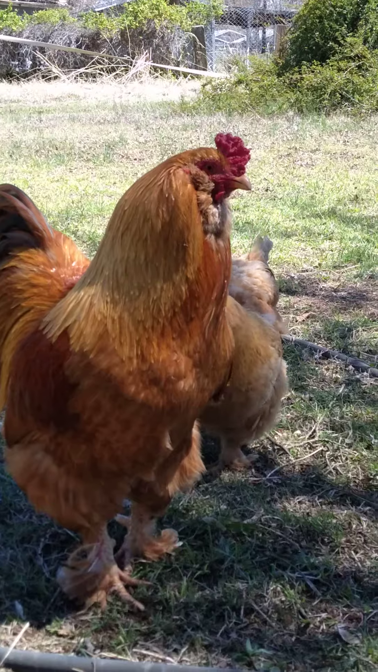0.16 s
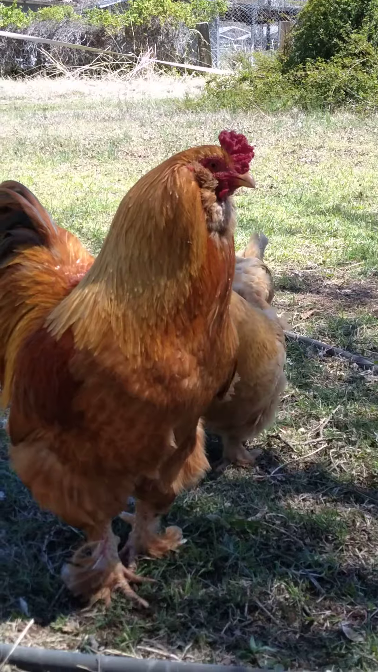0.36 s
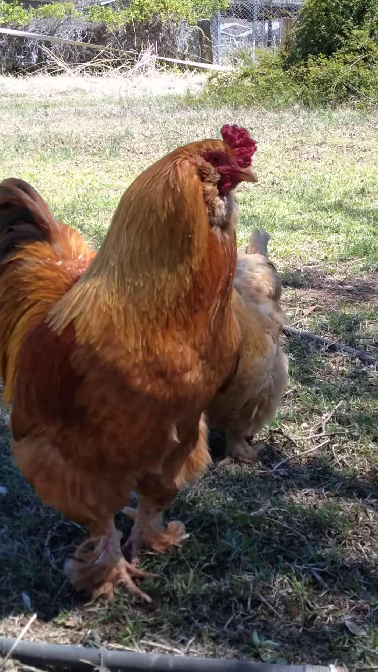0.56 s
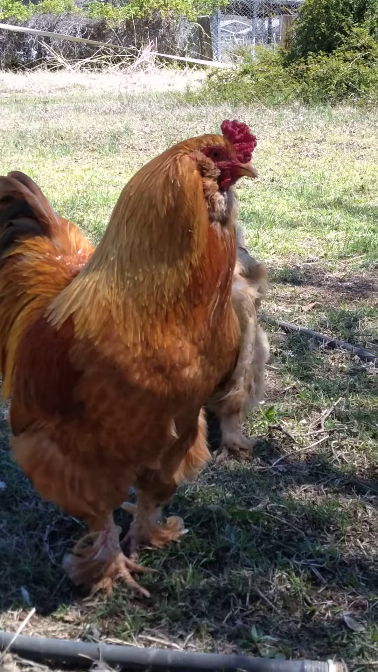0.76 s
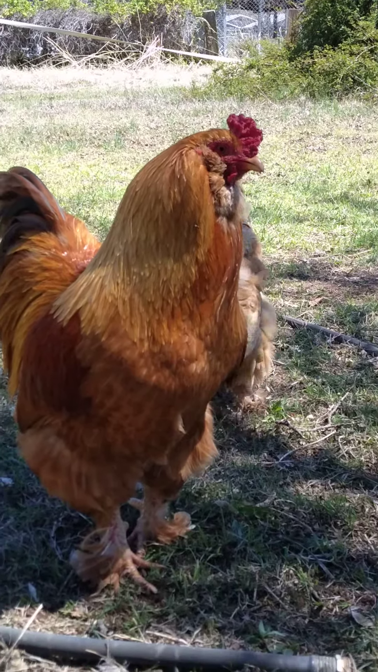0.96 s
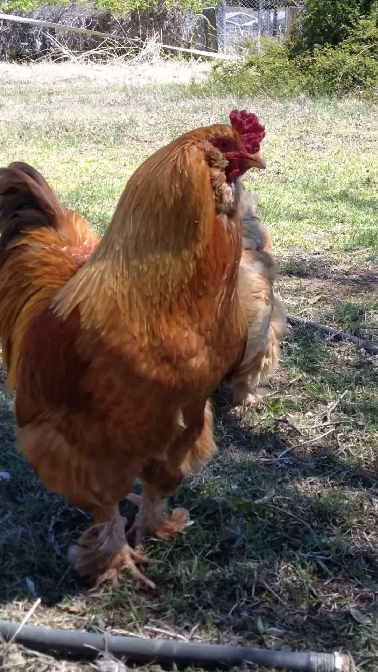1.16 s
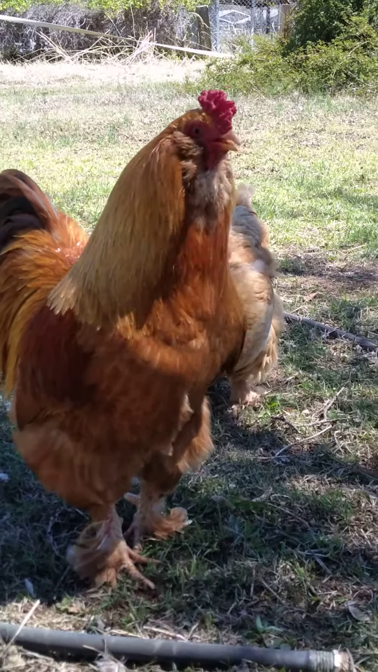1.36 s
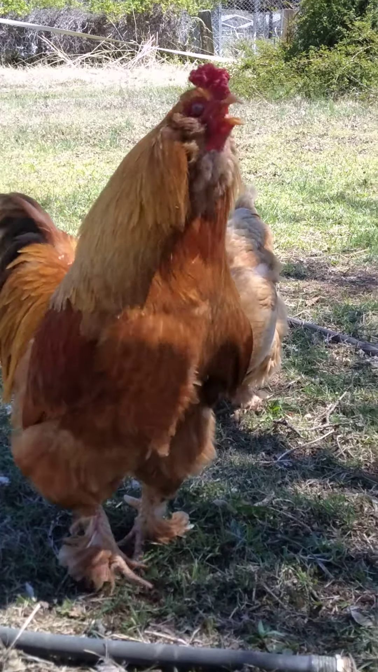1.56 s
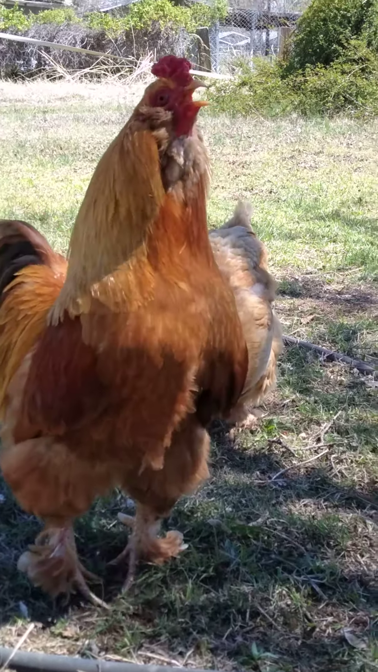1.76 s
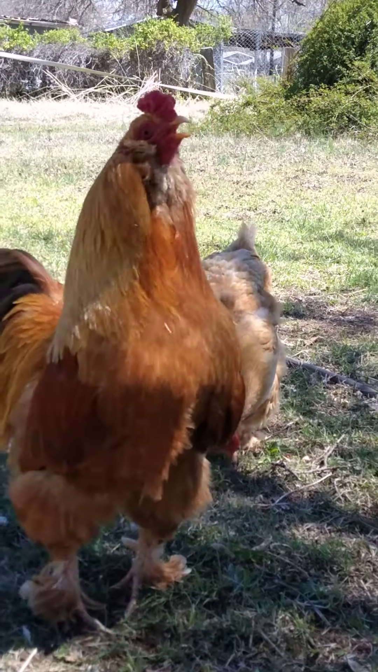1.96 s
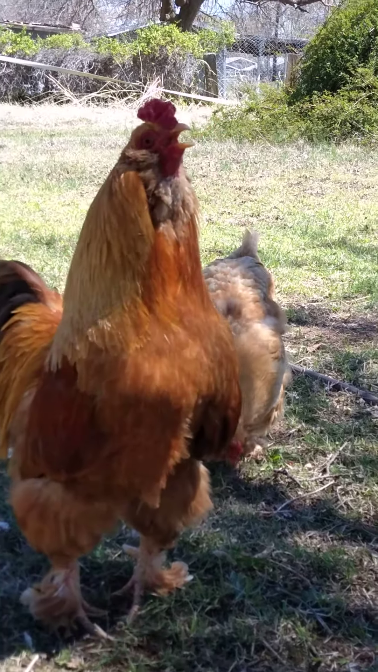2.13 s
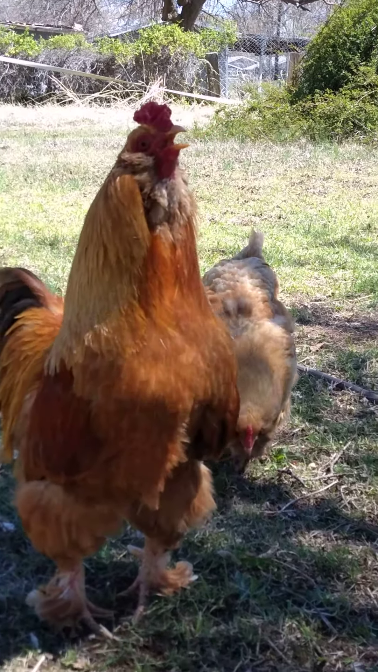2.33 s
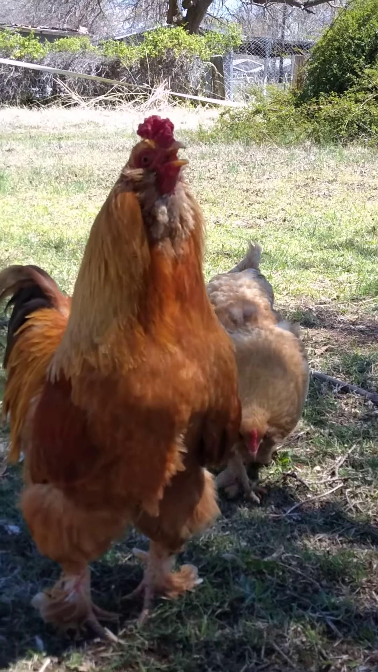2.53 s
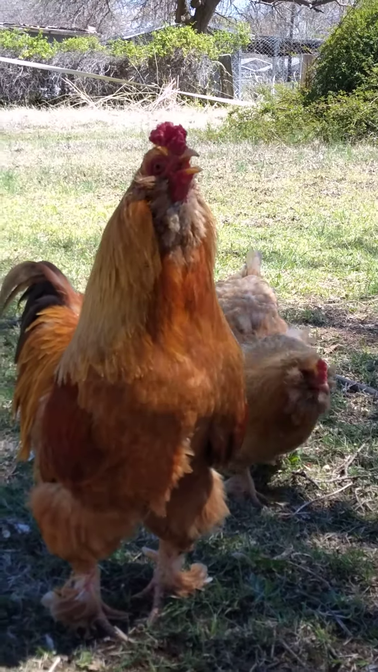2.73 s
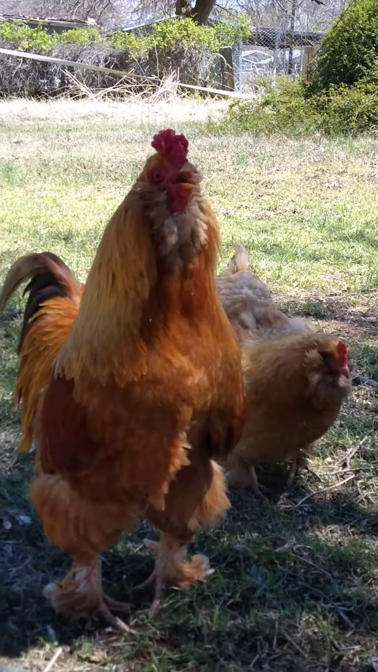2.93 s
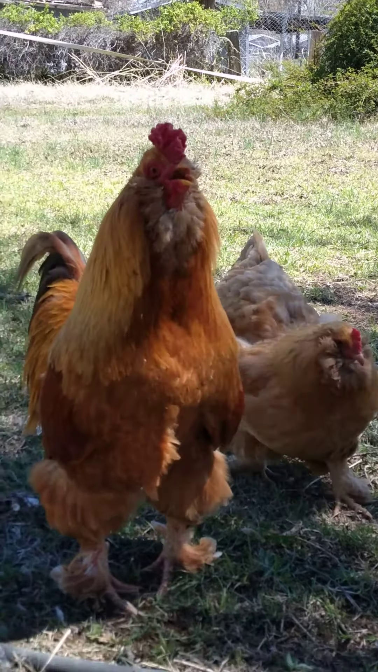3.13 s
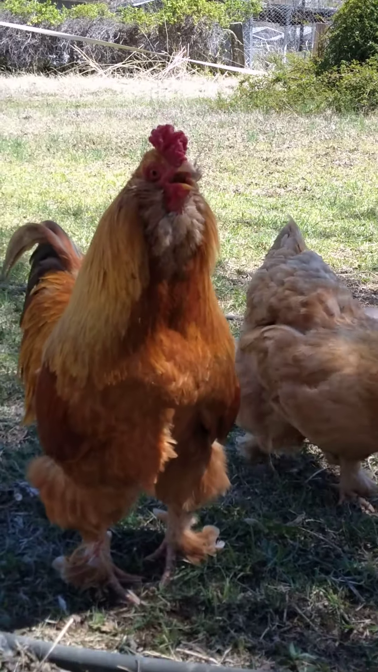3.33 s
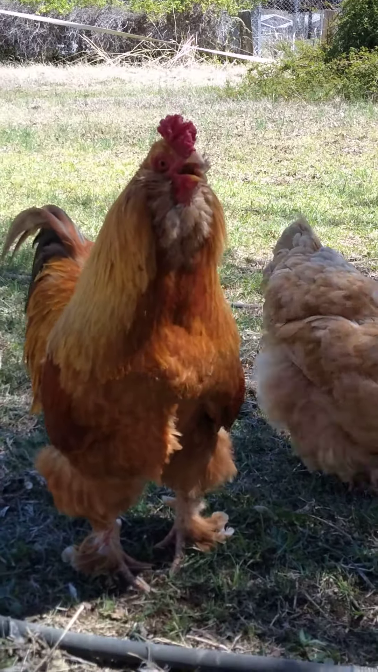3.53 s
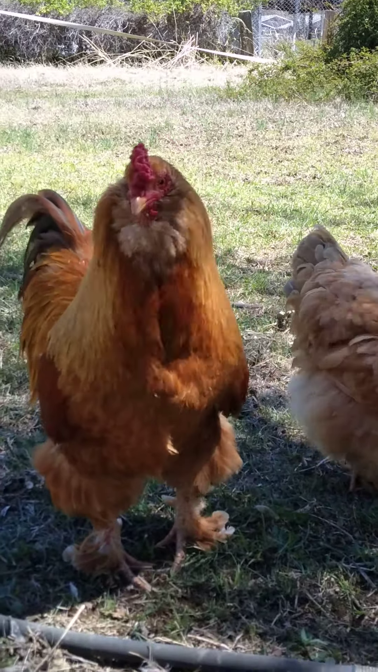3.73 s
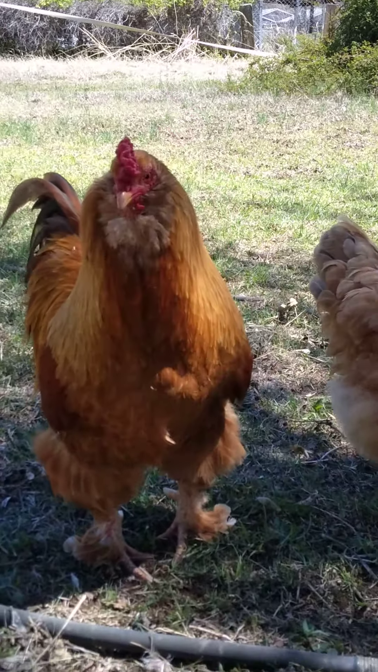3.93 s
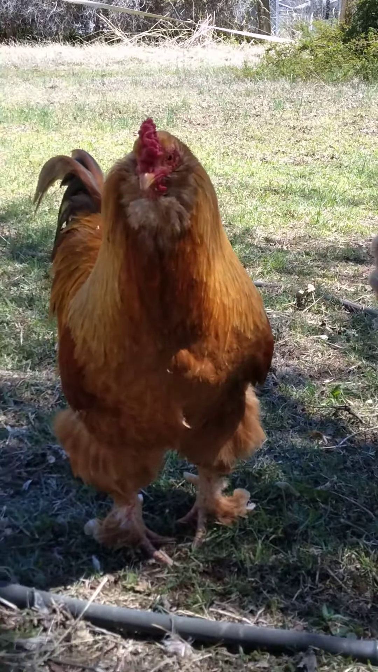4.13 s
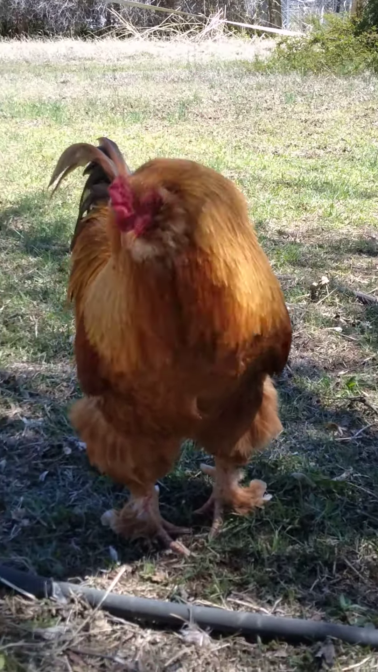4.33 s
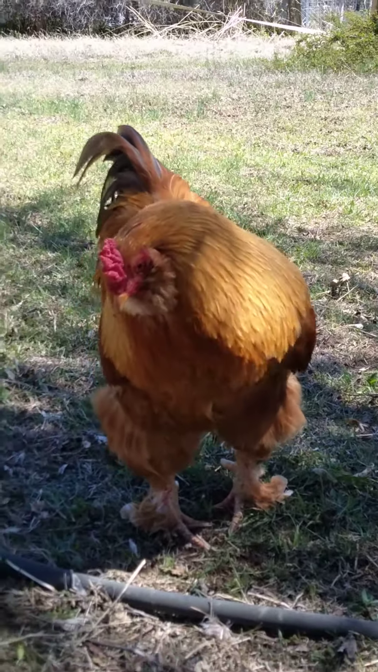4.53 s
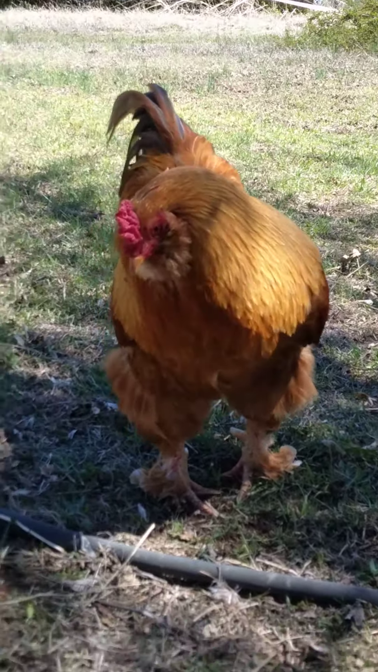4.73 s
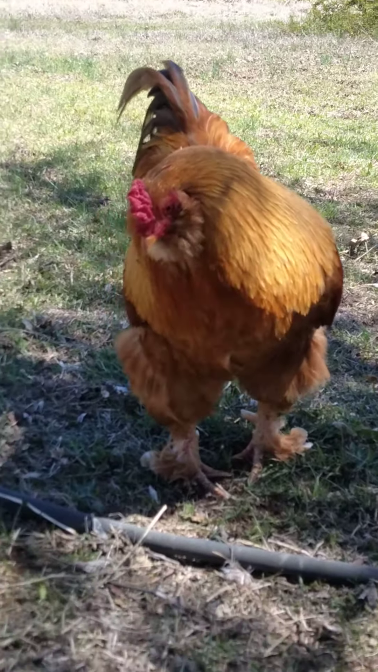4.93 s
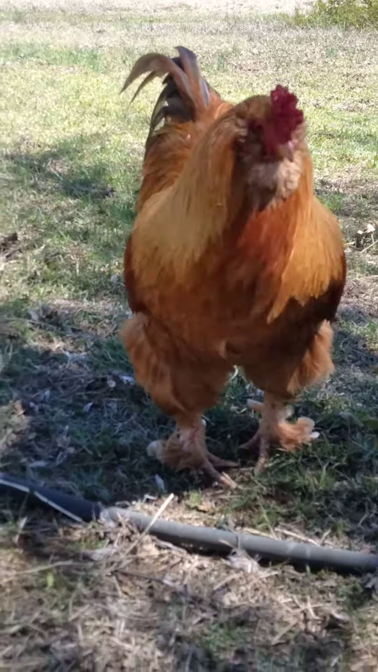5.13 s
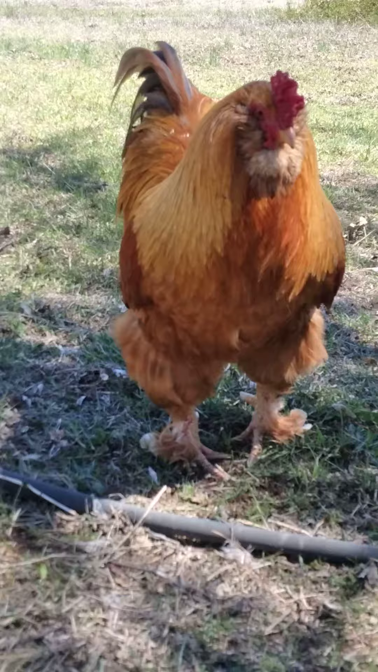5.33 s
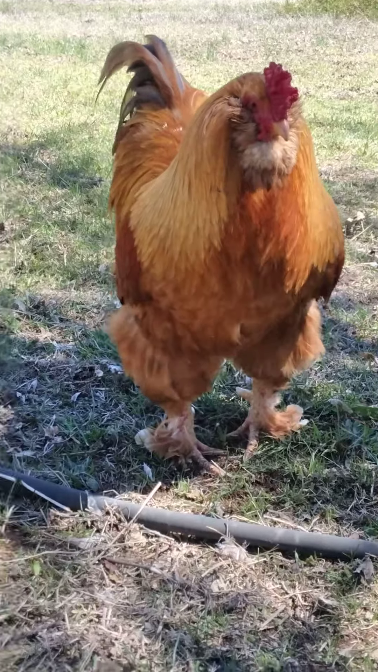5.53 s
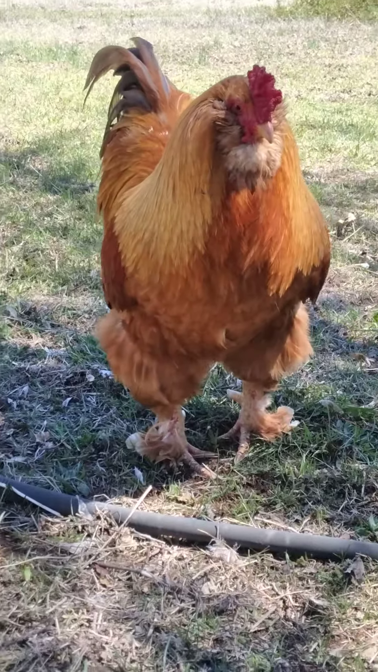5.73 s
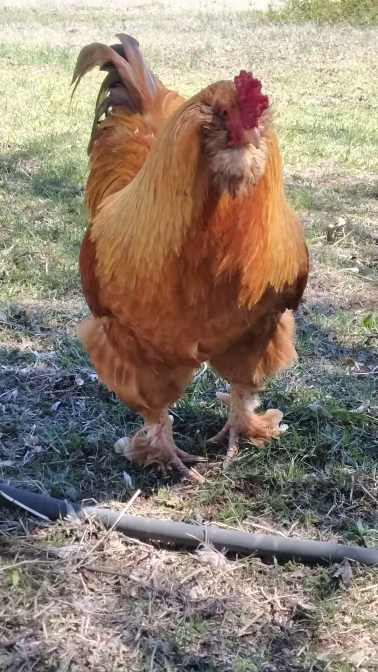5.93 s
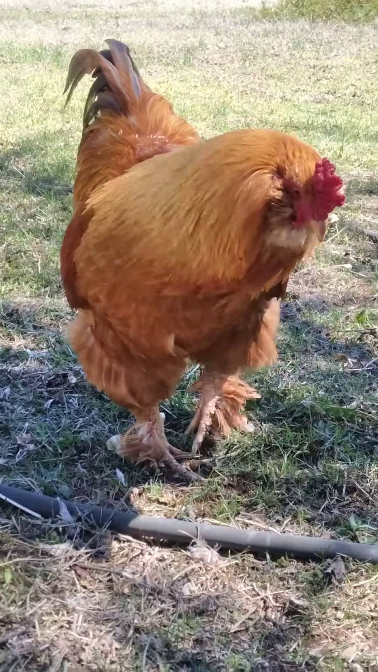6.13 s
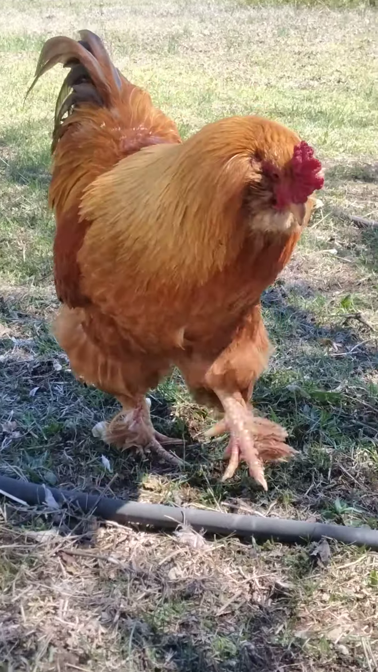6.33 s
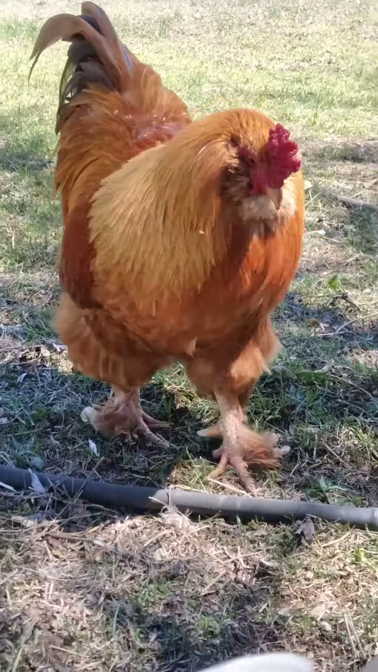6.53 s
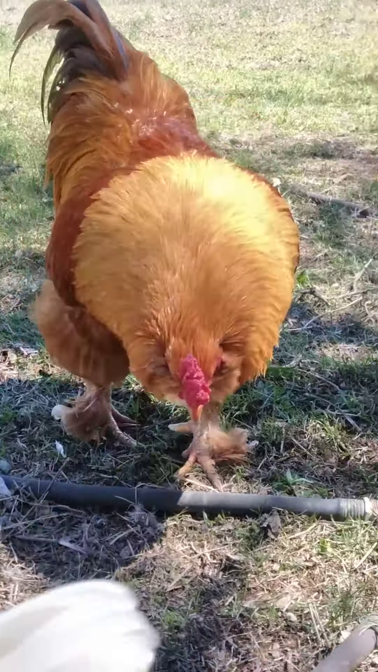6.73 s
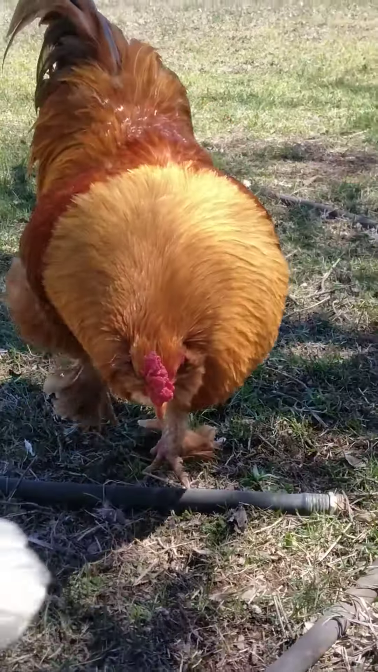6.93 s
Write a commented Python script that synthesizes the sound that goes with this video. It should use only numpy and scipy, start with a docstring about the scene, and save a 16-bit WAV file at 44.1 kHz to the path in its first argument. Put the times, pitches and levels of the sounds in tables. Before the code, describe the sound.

Close hand-held stereo pickup outdoors, nearly dry, with low rumble and a distant motor. A dull start-up bump and small falling tone come first. One rooster crows powerfully, brassy and rough, breaking in pitch and fading to a breathy gurgle. A quiet gap follows, then a low husky moan leads to quick, much softer clucks, with tiny dry ticks in the litter.

```python
"""A yard: a rooster close to a hand-held stereo recorder crows once, gurgles as his breath runs out, then clucks.
His voice is pulse trains and sines on drawn pitch curves, roughened with noise and rung through throat resonances.
A far motor hums on three wavering lines over noise-made air, rumble and murmur; dry ticks are puffs of noise.
The recorder starts from silence with a bump, a falling tone, a rustle and a tick."""
import sys
import numpy as np
from scipy import signal
from scipy.fft import rfft, irfft, next_fast_len
from scipy.io import wavfile
from scipy.ndimage import uniform_filter1d

SR = 44100
rng = np.random.default_rng(int(sys.argv[2]) if len(sys.argv) > 2 else 0)


def gain_from_decibels(decibels):
    """Convert decibel values to linear amplitude factors."""
    exponent = np.asarray(decibels, float) / 20
    return 10 ** exponent


def store_pcm(level_fs):
    """Save levels as 16-bit WAV."""
    pcm = np.round(np.clip(level_fs, -1, 1) * 32767).astype(np.int16)
    wavfile.write(sys.argv[1], SR, np.atleast_2d(pcm).T)


N = 312669   # length in samples

# The crow's melody. Each row: time in seconds, pitch in Hz, voice level in dB.
CROW_MELODY = [(1.585, 491.3, -45), (1.6, 505, -32.5), (1.615, 617, -14), (1.625, 704, -14),
               (1.66, 688.5, -15.5), (1.715, 735, -15), (1.735, 709.3, -13.5), (1.765, 788.4, -13.5),
               (1.78, 713, -13.5), (1.81, 702, -11), (1.84, 687, -21), (1.865, 576.3, -23),
               (1.885, 700, -16.5), (1.9, 772.5, -10), (1.912, 828.3, -11.5), (2.0, 827, -11.5),
               (2.02, 787, -13.5), (2.045, 740, -19.5), (2.062, 680.3, -14), (2.08, 759, -24),
               (2.11, 722.7, -14.5), (2.165, 757, -7), (2.185, 740, -11), (2.212, 733.5, -10.5),
               (2.228, 790, -9), (2.252, 778.6, -13), (2.268, 746, -7.5), (2.29, 823.4, -12.5),
               (2.455, 782, -12.5), (2.475, 733, -10), (2.5, 719.2, -13), (2.7, 726.8, -12),
               (2.79, 735.5, -12), (2.81, 785.5, -13), (2.95, 808.5, -16), (3.15, 812, -16.5),
               (3.31, 793, -18.5), (3.33, 768, -17.5), (3.4, 790.6, -16.5), (3.415, 703, -17),
               (3.46, 698, -20.5), (3.478, 764.5, -18.5), (3.5, 696, -23), (3.57, 675, -21.5),
               (3.598, 631, -20), (3.62, 565, -14), (3.635, 510, -27.5), (3.65, 553.7, -52)]
# How the membranes swing. Each row: time in seconds, then shares 0-1 of every-second-cycle swing,
# second voice, throb depth and hoarseness.
CROW_MANNER = [(1.6, 0.2, 0, .05, 0.88), (1.63, .9, 0.03, 0, 0.1), (1.69, 0, 0.5, 0, 0.14),
               (1.72, 0.7, 0.1, 0, 0.3), (1.81, 0.1, 0, 0.4, 0.27), (1.835, 0.3, .3, 0.2, 0.6),
               (1.875, .1, 0.4, .1, 0.81), (1.9, 0, 0, 0.4, 0.48), (2.02, 0, .6, 0, 0.42),
               (2.08, 0.2, 0.1, 0.4, 0.74), (2.12, .1, 0.5, .05, 0.06), (2.16, 0, .7, 0.4, 0.14),
               (2.27, .15, .1, .3, 0.26), (2.3, 0, 0.5, 0.2, 0.63), (2.45, .3, 0, 0.21, 0.51),
               (2.49, 0, 0.4, 0.6, 0.1), (2.78, 0, 0.4, .4, 0.06), (2.82, 0, 0, 0.1, 0),
               (2.9, 0, 0.7, 0.08, .7), (3.3, .13, 0.4, 0.02, 0.66), (3.34, 0.4, .7, 0.08, 0.44),
               (3.46, 0, 1, 0, 0.17), (3.49, .95, 0, 0.06, 0.18), (3.56, .95, 0, 0.34, 0.42),
               (3.6, .4, 0, 0.5, .65), (3.63, .1, 0, .1, 0.54)]
# Crests of the slow throb. Each row: time in seconds, throbs so far.
THROB_COUNT = [(2.131, 0), (2.181, 2), (2.268, 5), (2.474, 12), (2.783, 24), (2.866, 27), (3.004, 32),
               (3.087, 35), (3.291, 43), (3.5, 51)]
# Partials gain as they cross the throat resonances. Each row: pitch in Hz, octave over fundamental in dB,
# beak ring over voice in dB before hoarseness lifts it.
GAIN_BY_PITCH = [(490, 2.5, -22), (556, -28, -39.5), (650, -28, -24), (675, -19, -22.5), (694, 5, -30.5),
                 (723, 6, -33), (732.7, 7.5, -29), (762, 1.5, -36.5), (817.2, -3.5, -32),
                 (832.8, -7, -24.5)]
# Upper bands of the crow. Each row: time in seconds, throat ring over voice in dB, treble over voice in dB
# before the trim of its two bands.
UPPER_BANDS = [(1.6, -7, -16.5), (1.63, -8.5, -22.5), (1.72, -16.5, -29.5), (1.765, -23.5, -18),
               (1.81, -7.5, -30.5), (1.86, -21, -23.5), (1.89, -14, -23.5), (1.93, -27, -19.5),
               (2.01, -26.5, -27), (2.05, -13.5, -28.5), (2.11, -23.5, -23), (2.15, -31.5, -30),
               (2.26, -35.5, -32.5), (2.31, -25, -22.5), (2.46, -27.5, -26), (2.78, -35.5, -33.5),
               (2.95, -20.5, -18.5), (3.3, -9.5, -14.5), (3.35, -19, -28), (3.46, -14, -18.5),
               (3.57, 3, -20), (3.63, -9, -24)]
# Windpipe and mouth while crowing, low to top. Each row: resonance in Hz, width in Hz, relative level in dB.
LOW_THROAT = [(603, 54, -5), (1044, 34, -12.5), (1265.6, 86, -7.5), (1534, 110, -6), (1550, 694, -16.5),
              (1603, 120, -8.5)]
MID_THROAT = [(2592, 67, -5), (2717.5, 86, 10.5)]
BEAK_RING = [(3321, 67, 2.5), (3848, 840, 0.5), (4440, 140, -18)]
HIGH_THROAT = [(5054, 230, -1.5), (5793, 460, 0), (6878, 350, 0.3)]
TOP_THROAT = [(8494, 560, 9.5), (9570, 180, -6), (12500, 2400, -25), (13900, 190, -18)]
# Last of the breath. Each row: time in seconds, pitch in Hz, level in dB.
GURGLE_NOTE = [(3.66, 529.6, -38), (3.676, 515.7, -55), (3.69, 584.7, -40.5), (3.72, 587.7, -37),
               (3.758, 655.3, -55), (3.77, 672, -56), (3.782, 581.6, -43.5), (3.852, 580, -53),
               (3.87, 603, -46.5), (4.1, 532.5, -77)]
# Separate pops in the gurgle. Each row: time in seconds, strength in dB.
GURGLE_POPS = [(3.78, -33), (3.812, -39), (3.853, -37), (3.873, -35.5)]
# Air let out after the crow. Each row: time in seconds, level in dB.
EXHALE_LEVEL = [(3.655, -46), (3.743, -60.5), (3.779, -57.5), (3.845, -77.5), (3.853, -74), (3.919, -75.5),
                (3.94, -90)]
# Colour of that air. Each row: frequency in Hz, relative density in dB per Hz.
EXHALE_COLOUR = [(530, -24.5), (900, 2), (1120, -9), (1730, -2.5), (1910, -16.5), (2780, -5), (3300, -29),
                 (9000, -29.5), (11700, -61.5), (19800, -120)]

# Low moan before the clucks. Each row: time in seconds, pitch in Hz, clear voice in relative dB,
# husky part in dB, throat ring in dB, treble in dB.
MOAN = [(4.28, 233, -100.5, -84.5, -99, -105), (4.69, 233.3, -66, -58, -92, -96),
        (4.75, 233.1, -56, -54, -73, -83), (4.795, 196.6, -71, -50.5, -66, -79),
        (4.82, 180.6, -57, -62, -88, -97), (4.86, 195.3, -56, -55, -84, -89),
        (4.93, 197.7, -55, -73, -86.5, -97), (4.986, 202.5, -56.5, -52, -65.5, -72),
        (5.03, 186.6, -93, -69, -90, -100)]
# Mellow clucks, then sharp ones. Each row: start in seconds, length in seconds, pitch in Hz,
# clear voice, husky part and upper rings in dB, all three offset by the course.
MELLOW_CLUCKS = [(5.05, .25, 265, -49.5, -46.5, -64.5), (5.31, 0.17, 297.7, -49.5, -41.5, -57.5),
                 (5.5, .2, 295, -49, -42.5, -55.5), (5.71, .21, 295, -48, -43.5, -57),
                 (5.93, .165, 316, -47, -40.5, -57), (6.96, 0.1433, 296.6, -56, -43, -62.5)]
SHARP_CLUCKS = [(6.1, .175, 459, -42, -35.5, -48), (6.28, .16, 442.7, -40.5, -39.5, -51.5),
                (6.445, .165, 471.6, -41.5, -36, -44.5), (6.612, .16, 456.7, -42, -36.5, -48),
                (6.78, .11, 457.4, -52.5, -47, -69.5)]
# Course of a mellow and of a sharp cluck. Each row: share of length, pitch ratio,
# then clear voice, husky part, throat ring and treble in dB against the cluck's own levels.
MELLOW_COURSE = [(0, .84, -22, -21, -33.5, -42), (0.171, .95, -5.5, -6, -14, -9),
                 (.3, 1.005, -1, -14, -7.5, -8), (.45, 1.02, 0, -21, -3, -2),
                 (0.622, 1.015, -1.5, -4, -3, -5), (.75, .96, -9, -5.5, -8, -10),
                 (.88, .91, -10.5, -10.5, -11.5, -13.5), (1.001, .88, -28, -20, -36, -43)]
SHARP_COURSE = [(0, 1.0, -37, -19, -40, -44), (0.201, .99, -8.5, -5, -14, -18.5),
                (.46, 1.0, 0, -12.5, -2, -14), (0.601, 0.55, -15, -5.5, -8.5, -16),
                (.9, 1.0, -19.5, -19, -13, -27), (1.001, 1.0, -33, -28.5, -26, -31)]
# Windpipe and half-shut beak while clucking: clear voice, husky part, ring and treble.
# Each row: resonance in Hz, width in Hz, relative level in dB.
CLUCK_LOW = [(332, 340, -6), (570, 76, 4), (902, 120, 3), (1228, 40, -2.5), (1425, 43, -1)]
CLUCK_HUSK = [(413, 410, 2), (780, 480, 8.5), (936, 138, 12), (1090, 100, -3.5), (1360, 250, -17)]
CLUCK_RING = [(1680, 840, -4), (2116, 160, 5.5), (2344, 45, 14.5), (2520, 100, -46)]
CLUCK_HIGH = [(3130, 600, -3.5), (3696, 240, 6), (4390, 700, -0.5), (5710, 630, -1.5), (6443, 660, -2),
              (7750, 2100, -4)]

# The two microphones in their housing. Each row: frequency in Hz, left minus right in dB.
PORT_BALANCE = [(0, 2), (300, -2), (800, 2), (1500, 4), (2400, 7), (3000, 3), (3700, -6), (4400, -2),
                (5100, 6), (7200, 11), (8000, -1), (9000, -10), (10000, -18), (11500, 0), (16000, 0)]
# Lead of the left microphone, head raised to crow, then lowered to cluck.
# Each row: frequency in Hz, lead in radians.
CROW_LEAD = [(0, 0), (800, -.1), (1450, -.6), (1650, -1.6), (2100, -1.8), (2800, -3.8), (3600, -5.1),
             (4200, -5.1), (5000, -4.7), (6000, -6.5), (7000, -8.3), (8600, -10.8), (10500, -13.6),
             (16000, -14)]
CLUCK_LEAD = [(0, 0), (800, .5), (2200, .4), (3000, .8), (3700, .3), (4200, 2.4), (5500, .3), (7200, 0),
              (16000, -3)]

# Faint dry ticks in the litter. Each row: time in seconds, level at the onset in dB.
LITTER_TICKS = [(.943, -70), (4.18, -71), (5.384, -62), (6.215, -55), (6.312, -54.5), (6.556, -56)]
# Far motor lines. Each row: frequency at speed ratio 1 in Hz, level in dB before the swell,
# share of the swell followed.
MOTOR_LINES = [(99.7, -52.5, 1.0), (151, -57, 0.3), (198, -61.5, 0.89)]
# Course of the motor. Each row: time in seconds, speed ratio, swell in dB.
MOTOR_COURSE = [(.7, 1.0, 3), (.95, 1.0, -1), (1.23, 1.0, 9), (2.25, 0.92, 7), (2.8, 0.87, -0.5),
                (3.8, 1.0, -4.5), (4.65, 0.98, -2), (5.5, 0.96, -2.5), (5.8, 0.9, 4.5), (7.09, 0.98, 3)]
# Yard levels. Each row: time in seconds, then air on the ports, traffic rumble and murmur in relative dB.
YARD_LEVELS = [(.39, -73, -71, -125), (.46, -71, -70, -120), (.556, -56, -52.5, -70), (.7, -50.5, -60, -70),
               (1.46, -55, -60.5, -63.5), (1.6, -50.5, -59, -65.5), (3.4, -52.5, -64.5, -70),
               (4.0, -57.5, -60, -71.5), (4.4, -50.5, -62.5, -68), (5.2, -59, -59.5, -68),
               (7.09, -58, -57, -73.5)]
# Colours of rumble and murmur. Each row: frequency in Hz, relative density in dB per Hz.
RUMBLE_COLOUR = [(60, -0.5), (120, -2), (200, -4), (270, -3.5), (350, -17.5), (450, -29.5)]
MURMUR_COLOUR = [(330, -4.5), (480, -2.5), (650, -12), (900, -22.5), (1400, -37.5), (3000, -36.5)]
# Falling tone as the recorder starts. Each row: time in seconds, pitch in Hz, level in dB.
START_TONE = [(.51, 216, -77), (.54, 197.4, -47), (.6, 165, -44.5), (.66, 114, -47), (.72, 95.7, -68)]
# Rustle at the start. Each row: time in seconds, level in dB before it is chopped.
RUSTLE_LEVEL = [(0.4, -76), (0.426, -68.5), (0.504, -80), (0.548, -59.5), (0.586, -55.5), (0.612, -55.5),
                (0.622, -77), (0.7, -67)]
# Colour of the rustle. Each row: frequency in Hz, relative density in dB per Hz.
RUSTLE_COLOUR = [(180, -24), (300, -1.5), (955, -18), (1280, -13.5), (2340, -19), (2860, -36), (5990, -36),
                 (6880, -17), (12000, -74), (15600, -85), (22000, -120)]
OPEN_S = .385   # the input opens and the bump begins, seconds


def rms_one(x):
    """Scale to unit power."""
    return x / np.sqrt(np.mean(np.abs(x) ** 2) + 1e-20)


def in_time(rows):
    """Columns of a table, drawn as straight lines sample by sample."""
    s, *columns = np.transpose(rows)
    return [np.interp(np.arange(N) / SR, s, c) for c in columns]


def gate(rows, fade=0.0025):
    """1 while a table lasts, with fades in seconds."""
    first, last = rows[0][0], rows[-1][0]
    return in_time([(first - fade, 0), (first, 1), (last, 1), (last + fade, 0)])[0]


def cycles(hz):
    """Running phase of a pitch curve, radians."""
    return 2 * np.pi * np.cumsum(hz) / SR


def wander(hz):
    """Complex noise low-passed at hz, unit power."""
    white = rng.standard_normal(N) + 1j * rng.standard_normal(N)
    return rms_one(signal.lfilter(*signal.butter(2, hz, fs=SR), white))


def coloured(spectrum, alike):
    """Stereo noise of unit power, its spectrum closed at both ends; alike 1 is mono, 0 is unrelated sides."""
    size = next_fast_len(N)
    mid, side = rng.standard_normal((2, size))
    hz = np.fft.rfftfreq(size, 1 / SR) + 1
    at, db = np.transpose(spectrum)
    shape = gain_from_decibels(np.interp(np.log(hz), np.log(at), db, left=-80, right=-80))
    pair = np.sqrt(1 + alike) * mid + np.sqrt(np.maximum(1 - alike, 0)) * side * [[1], [-1]]
    return rms_one(irfft(rfft(pair) * shape, size)[:, :N])


def throat(x, modes, steep):
    """Parallel resonances of alternating sign, band-limited to steep (Hz), level evened over 40 ms."""
    out = 0
    for k, (hz, width, db) in enumerate(modes):
        r = np.exp(-np.pi * width / SR)
        pole = [1, -2 * r * np.cos(2 * np.pi * hz / SR), r * r]
        ring = signal.lfilter([(1 - r * r) / 2, 0, (r * r - 1) / 2], pole, x)
        out = out + (-1) ** k * gain_from_decibels(db) * ring
    out = signal.sosfilt(signal.butter(4, steep, "band", fs=SR, output="sos"), out)
    return out / np.sqrt(uniform_filter1d(out ** 2, size=1764) + 1e-9)


def pulses(phase, count):
    """Membrane closures: count equal harmonics, as an analytic signal."""
    turn = np.exp(1j * phase)
    return turn * (1 - turn ** count) / (1 - .999999 * turn)


def hoarse(train, share, hz):
    """A share of the closures is made uneven in strength and timing by noise below hz."""
    share = np.clip(share, 0, 1)
    return (train * (np.sqrt(1 - share) + np.sqrt(share) * wander(hz))).real


def crow():
    """Two strong partials, a rasp between them and higher throat rings, all on one pitch."""
    pitch, voice_db = in_time(CROW_MELODY)
    half, second, depth, rough = np.clip(in_time(CROW_MANNER), 0, .99)
    at, *laws = np.transpose(GAIN_BY_PITCH)
    over_db, beak_over_db = [np.interp(pitch, at, law) for law in laws]
    first_db = voice_db - 10 * np.log10(1 + gain_from_decibels(2 * over_db))
    octave_db = first_db + over_db
    # hoarseness and strong-weak cycles both raise the rasp
    rasp_db = voice_db - 40 + 51 * rough + 15 * half
    beak_db = voice_db + beak_over_db + 9.5 * rough
    ring_db, treble_db = voice_db + in_time(UPPER_BANDS)

    throb = np.exp(2j * np.pi * in_time(THROB_COUNT)[0])
    phase = cycles(pitch * (1 + 0.02 * depth * throb.real + 0.016 * rough * wander(100).real))
    shake = np.exp(.5j * rough * wander(120).real) * (1 + .15 * rough * wander(120).real)
    first = np.exp(1j * phase) * shake * (1 - .2 * depth * throb)
    out = np.sqrt(2) * gain_from_decibels(first_db) * first.imag
    # the throb adds a near neighbour above the octave, which beats with it
    octave = np.exp(2j * phase) * shake * (1 + depth * throb) / np.sqrt(1 + depth ** 2)
    out += np.sqrt(2) * gain_from_decibels(octave_db) * octave.real

    train = pulses(phase, count=20)
    # a second, unsteady voice near 575.7 Hz mixes with the first: sum and difference tones
    gap = cycles((pitch - 575.7) * (1 + 0.05 * wander(40).real))
    uneven = np.sqrt(half) * np.cos(phase / 2)   # strong-weak cycles give half lines
    uneven = uneven + np.sqrt(second) * np.cos(gap)
    uneven = uneven + np.sqrt(np.maximum(1 - half - second, .01)) * 0.94 * wander(340)
    rasp = throat((train * uneven).real, LOW_THROAT, [480, 2150])
    out += gain_from_decibels(rasp_db) * rasp * (1 - .5 * depth * throb.real)

    strong_weak = train * (1 + .8 * half * np.cos(phase / 2))
    upper = hoarse(strong_weak, 1.6 * rough ** 2.2, 270)
    out += gain_from_decibels(ring_db) * throat(upper, MID_THROAT, [2050, 3050]) * (1 + 0.91 * depth * throb.real)
    out += gain_from_decibels(beak_db) * throat(upper, BEAK_RING, [3200, 4250])

    # the high treble comes in puffs with the throb
    puff = 1 + np.clip(0.88 * np.maximum(depth, second), 0, .95) * throb.real
    upper = hoarse(strong_weak, .04 + 1.5 * rough ** 2, 350)
    high = throat(throat(upper, HIGH_THROAT, [4850, 7400]), HIGH_THROAT, [4850, 7400])
    out += gain_from_decibels(treble_db - 3.5) * high * puff
    out += gain_from_decibels(treble_db - 7.5) * throat(upper, TOP_THROAT, [7700, 15500])
    # a hoarse throb chokes the voice between crests
    choke = np.clip(5.7 * depth * rough, 0, .9) * ((1 - throb.real) / 2) ** 3
    return out * (1 - choke) * gate(CROW_MELODY)


def gurgle():
    """A weak wavering note near the windpipe resonance, with single soft pops, over escaping air."""
    pitch, db = in_time(GURGLE_NOTE)
    note = np.sqrt(2) * gain_from_decibels(db) * hoarse(np.exp(1j * cycles(pitch)), 0.18, 56) * gate(GURGLE_NOTE)
    clicks = np.full(N, 1e-18)
    for s, strength_db in GURGLE_POPS:
        clicks[round(s * SR)] = gain_from_decibels(strength_db)
    soft = signal.lfilter(*signal.butter(3, 900, fs=SR), clicks)
    # each pop rings at 610 Hz and decays over 8.9 ms
    r, w = np.exp(-1 / (0.0089 * SR)), 2 * np.pi * 610 / SR
    pops = signal.lfilter([0, np.sin(w)], [1, -2 * r * np.cos(w), r * r], soft)
    air = gain_from_decibels(in_time(EXHALE_LEVEL)[0]) * coloured(EXHALE_COLOUR, alike=0.75)[0]
    return note + air * gate(EXHALE_LEVEL, fade=0.0157) + pops


def played(calls, course):
    """Every call runs the same course, stretched to its length, pitch and strength."""
    notes = []
    for s, length, hz, clear_db, husky_db, upper_db in calls:
        notes.append([(s + length * share, hz * ratio, clear_db + clear, husky_db + husky,
                       upper_db + ring, upper_db + treble)
                      for share, ratio, clear, husky, ring, treble in course])
    return notes


def clucks():
    """A moan, then short notes: a clear pulse voice and a husky one, whose balance shifts through each note."""
    calls = [MOAN] + played(MELLOW_CLUCKS, MELLOW_COURSE) + played(SHARP_CLUCKS, SHARP_COURSE)
    calls = sorted(calls)
    pitch, clear_db, husky_db, ring_db, treble_db = in_time(np.concatenate(calls))
    train = pulses(cycles(pitch * (1 + 0.0051 * wander(32.7).real)), count=24)
    voice = gain_from_decibels(clear_db + 5.5) * throat(hoarse(train, 0.022, 67.7), CLUCK_LOW, [240, 1320])
    voice += gain_from_decibels(husky_db) * throat(hoarse(train, 0.89, 640), CLUCK_HUSK, [350, 1600])
    # the huskier the low voice, the more breath noise in the rings
    husk = 1 / (1 + gain_from_decibels(2 * (clear_db - husky_db)))
    airy = rms_one(hoarse(train, .2, 200)) * (1.2 - husk)
    airy = airy + (.12 + .45 * husk) * rng.standard_normal(N)
    voice += gain_from_decibels(ring_db) * throat(airy, CLUCK_RING, [1650, 2950])
    breathy = airy + .55 * rng.standard_normal(N)
    # the treble passes its resonances twice, which leaves hollows between them
    treble = throat(throat(breathy, CLUCK_HIGH, [2800, 11500]), CLUCK_HIGH, [2800, 11500])
    voice += gain_from_decibels(treble_db) * treble
    return voice * sum(gate(call, fade=0.0098) for call in calls).clip(0, 1)


def at_microphones(x, lead, echo_db, echo_s):
    """Each microphone gets its own level and phase by frequency, and its own scatter from ground and fence."""
    size = next_fast_len(N)
    hz = np.fft.rfftfreq(size, 1 / SR)
    half = gain_from_decibels(np.interp(hz, *np.transpose(PORT_BALANCE)) / 2)
    half = half * np.exp(.5j * np.interp(hz, *np.transpose(lead)))
    pair = np.array([half, 1 / half])
    pair /= np.maximum(np.abs(pair.mean(axis=0)), .55)   # evens the mono sum, with limited boost
    t = np.arange(SR // 3) / SR
    scatter = rng.standard_normal((2, len(t))) * np.exp(-t / echo_s) * (t > .002)
    scatter *= gain_from_decibels(echo_db) / np.sqrt(np.sum(scatter ** 2, axis=1, keepdims=True))
    return irfft(rfft(x, size) * (pair + rfft(scatter, size)), size)[:, :N]


def ticks():
    """Short bright puffs of noise, each starting at once and decaying over 9 ms."""
    t = np.arange(N) / SR
    shape = sum(gain_from_decibels(db) * np.exp(-np.abs(t - s) / .009) * (t > s) for s, db in LITTER_TICKS)
    return shape * coloured([(2500, -1), (4500, 4.5), (8000, 2), (12000, -16.5)], alike=0.24)


def motor():
    """Three sine lines share one speed curve, swell by their own share and waver slowly, a little to the left."""
    speed, swell_db = in_time(MOTOR_COURSE)
    out = 0
    for hz, db, share in MOTOR_LINES:
        level = gain_from_decibels(db + share * swell_db + wander(2.6).real)
        line = hoarse(np.exp(1j * cycles(hz * speed)), 0.03, 1.4)
        out = out + np.sqrt(2) * level * line
    return out * gate(MOTOR_COURSE, fade=0.14) * gain_from_decibels(np.array([[.8], [-.8]]))


def yard():
    """Noise beds: lumpy air on the ports, low rumble, a faint murmur that soon sinks, and steady hiss."""
    air_db, rumble_db, murmur_db = in_time(YARD_LEVELS)
    air = gain_from_decibels(air_db + 1.8 * wander(7.1).real + 1.2 * wander(1.5).real)
    air = air * coloured([(12, -5.0), (30, 4.0), (55, -8.5), (85, -4)], alike=.2)
    air = air * gain_from_decibels(np.array([[3.0], [-1.5]]))   # stronger on the left
    rumble = gain_from_decibels(rumble_db + 3.5 + wander(13).real) * coloured(RUMBLE_COLOUR, alike=0.86)
    murmur = gain_from_decibels(murmur_db + 4.0) * coloured(MURMUR_COLOUR, alike=0.19)
    hiss = gain_from_decibels(-91) * coloured([(100, -2), (2000, -2.5), (8000, -5), (16000, -8)], alike=0)
    return (air + rumble + murmur + hiss) * gate(YARD_LEVELS, fade=.01)


def start():
    """The input settles: a slow bump, a falling sine, a noise rustle and a decaying 300 Hz tick."""
    t = np.maximum(np.arange(N) / SR - OPEN_S, 0)
    bump_long_s = .07   # from opening to the top of the bump
    bump = gain_from_decibels(-42) * t / bump_long_s * np.exp(1 - t / bump_long_s)
    hz, db = in_time(START_TONE)
    since = np.maximum(np.arange(N) / SR - .609, 0)
    tick = gain_from_decibels(-33) * np.sin(2 * np.pi * 300 * since) * np.exp(-since / 0.0035)
    rustle = gain_from_decibels(in_time(RUSTLE_LEVEL)[0]) * coloured(RUSTLE_COLOUR, alike=0.69) * gate(RUSTLE_LEVEL)
    # for its first tenth of a second it is chopped into a faint buzz of 100 ticks a second
    rustle *= np.where(t < .1, 4 * np.cos(np.pi * 100 * t) ** 40, 1)
    return bump + gain_from_decibels(db) * np.sin(cycles(hz)) * gate(START_TONE) + tick + rustle


def scene():
    """Bird in front, yard around."""
    crowing = at_microphones(crow() + gurgle(), CROW_LEAD, echo_db=-28, echo_s=.05)
    clucking = at_microphones(clucks(), CLUCK_LEAD, echo_db=-9, echo_s=.006)
    clucking = clucking * gain_from_decibels([[1.0], [0]])   # left 1 dB up
    return crowing + clucking + ticks() + motor() + yard() + start()


def roll_off(x):
    """The treble ends steeply here."""
    return signal.sosfilt(signal.butter(12, 15600, fs=SR, output="sos"), x)


def record(dry):
    """Silent until the input opens; anything over full scale clips."""
    opened = np.arange(N) > OPEN_S * SR
    mix = np.clip(dry * opened, -1, 1)
    return roll_off(mix)


dry = scene()
out = record(dry)
store_pcm(out)
```